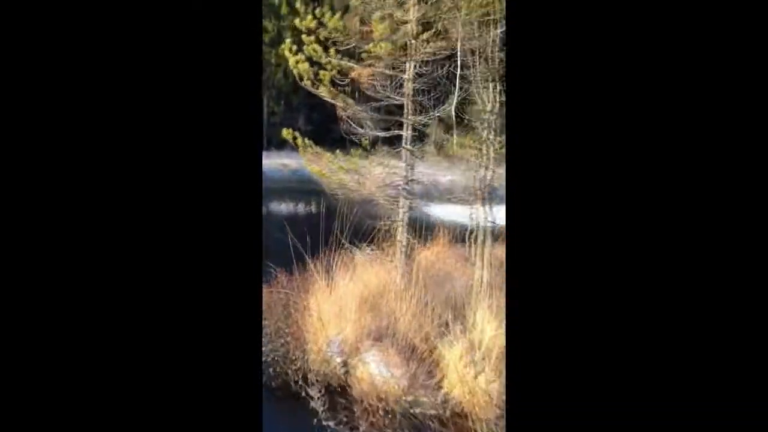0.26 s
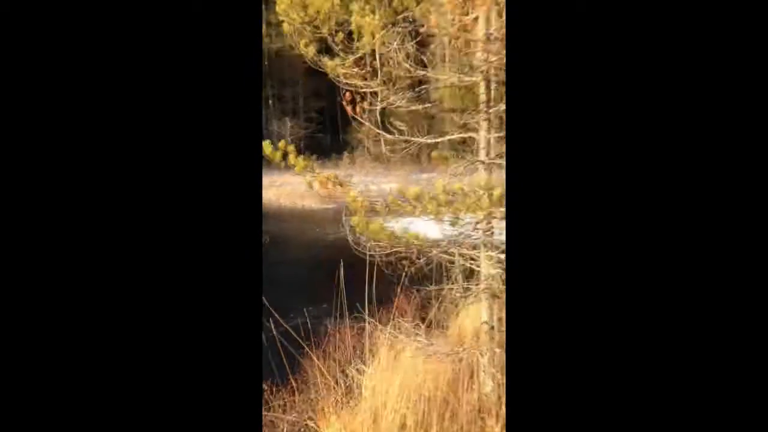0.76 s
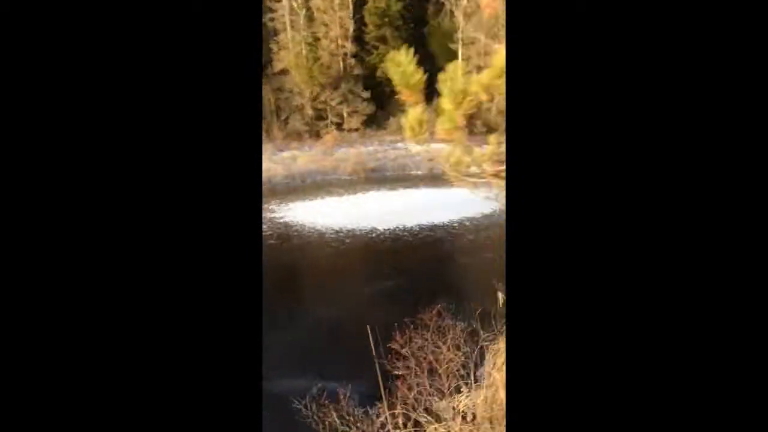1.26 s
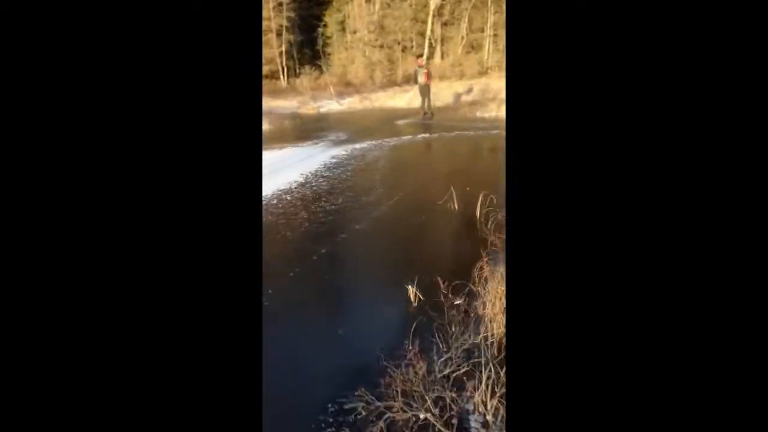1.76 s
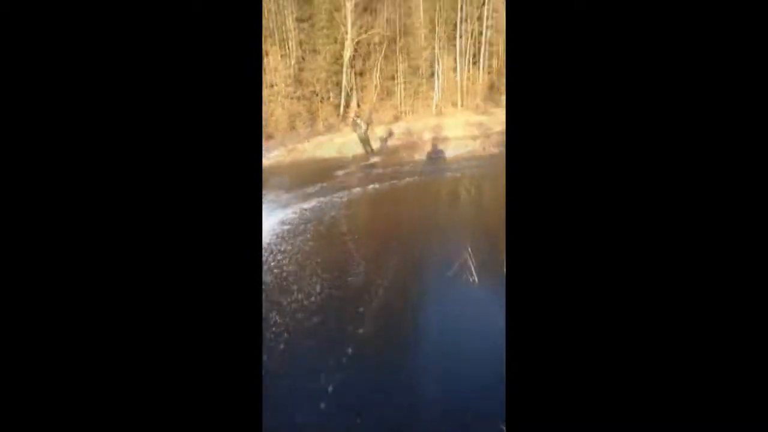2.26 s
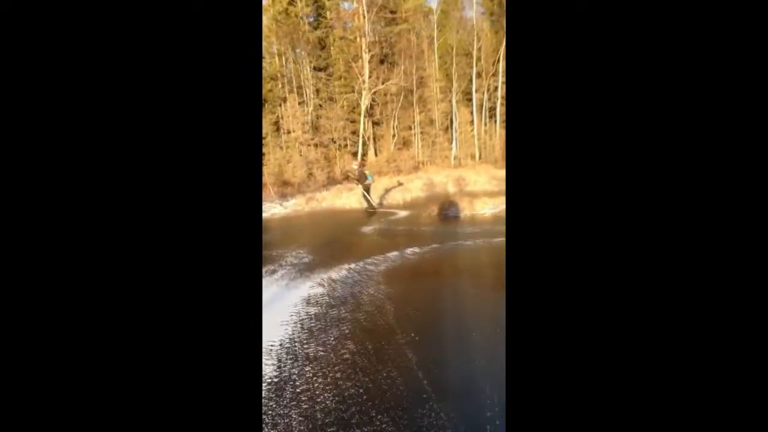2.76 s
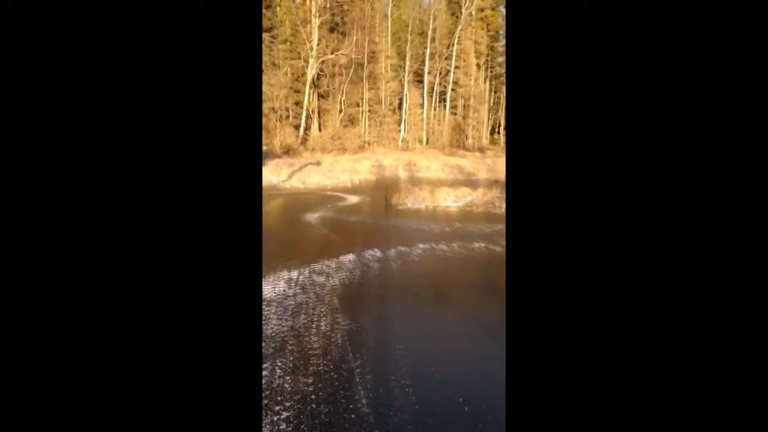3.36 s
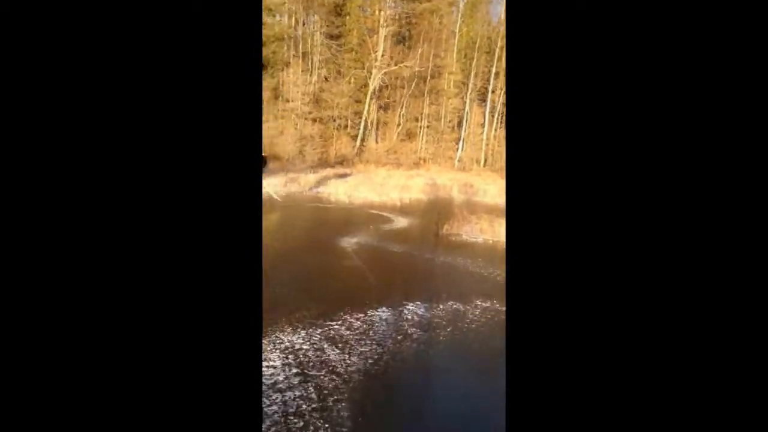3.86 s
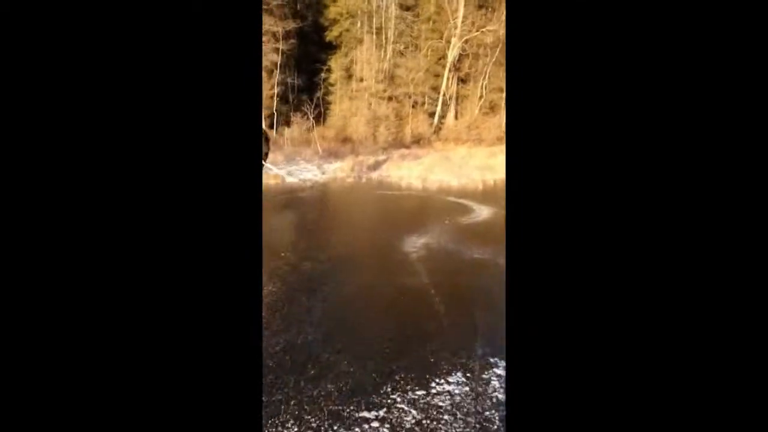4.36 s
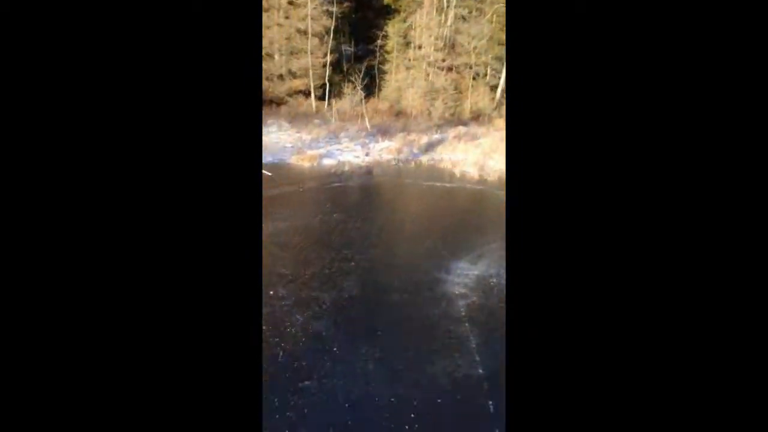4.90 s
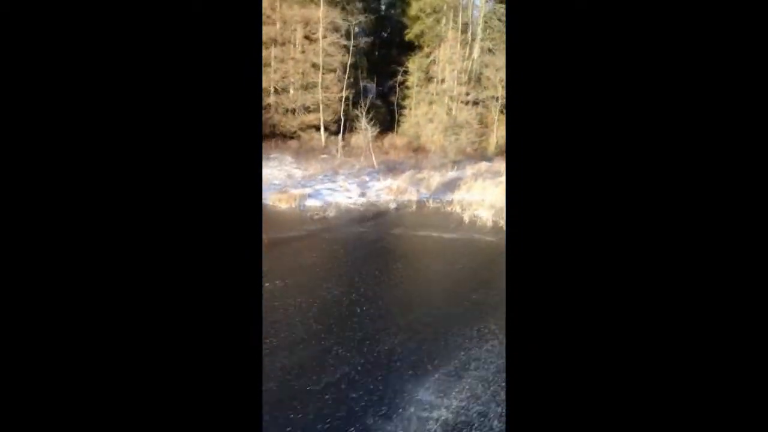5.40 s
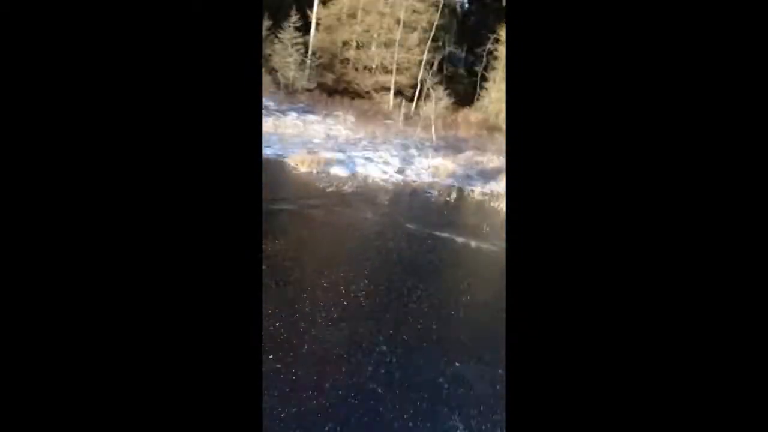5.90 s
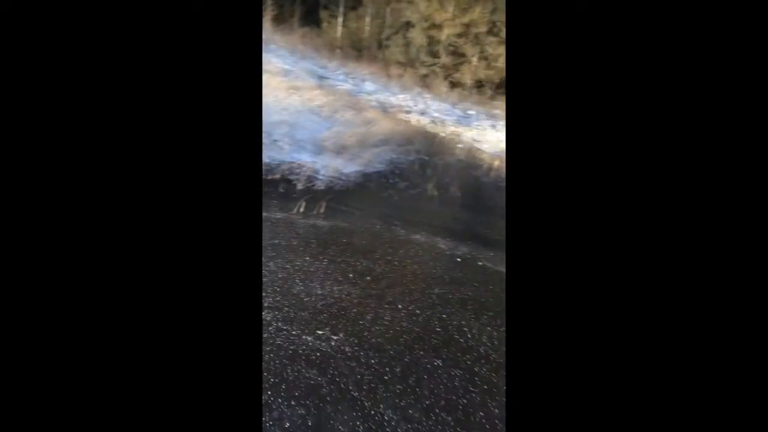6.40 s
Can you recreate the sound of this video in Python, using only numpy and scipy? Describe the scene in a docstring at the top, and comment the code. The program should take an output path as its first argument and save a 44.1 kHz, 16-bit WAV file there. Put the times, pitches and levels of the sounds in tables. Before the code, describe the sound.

A skater's long steel blades on bumpy lake ice, close and dry, over very faint still outdoor air. From 0 to 0.9 s, short gritty scrapes mix with quick metallic rattles, hollow clacks and boot thumps; a small chirp comes near 0.7. From about 1.0 to 1.6 a stronger, smooth ringing scrape swells in several pushes, then fades. Between 1.7 and 3.0 lighter hissing glides with icy fizz pass, with only scattered taps and a soft low ice note near 2.6. A sharp knock at 3.1 begins rougher going: crackles, a cluster of clacks around 3.5, brief slips, and sparse contact near 4. From 4.36 to 5.4 knocks rattle densely, with short dull ice notes. After a lull, a heavy clack at 5.56 leads to the loudest sound from 5.7: a harsh, bright edge scrape, catching repeatedly, easing, then surging again near 6.4 to the end.

```python
"""A frozen lake: long skates run over bumpy ice, heard by the skater over faint still air.
Breaking grains of ice, made as random clicks and noise, grind, ring the steel blades and rumble the boot.
Ridges and lumps give short rattling knocks with a boot thump; blades chirp as they slip sideways, and
the ice sheet sings a few short low notes. Near the end an edge digs in and scrapes hard, catching again
and again."""
import sys
import numpy as np
from scipy import signal
from scipy.fft import rfft, irfft
from scipy.io import wavfile
from scipy.ndimage import uniform_filter1d

SR = 44100
rng = np.random.default_rng(int(sys.argv[2]) if len(sys.argv) > 2 else 0)


def transcribe(u):
    """Save the signal u as a 16-bit wav file named by the first command-line argument.

    u: samples, shape (n,) or (channels, n), limited to [-1, 1]; the rate is SR.
    q: integer samples, one column per channel.
    """
    v = np.clip(np.atleast_2d(u).T, -1, 1)
    q = np.round(v * 32767).astype(np.int16)
    wavfile.write(sys.argv[1], SR, q)


N = 292824
BINS = np.maximum(abs(np.fft.fftfreq(4096, 1 / SR)), 1)  # frequencies of the sound colours, Hz


def amp(db):
    """Turns dB into a plain factor."""
    return 10 ** (np.asarray(db) / 20)


def unit(x):
    """Scales to rms 1."""
    return x / np.sqrt(np.mean(x ** 2) + 1e-20)


def add(mix, s, sound):
    """Lays a sound into the mix at time s."""
    part = mix[max(round(s * SR), 0):][:len(sound)]
    part += sound[:len(part)]


def colour(gain):
    """Makes a filter, of energy 1, that answers at once and has the given gains."""
    spectrum = np.exp(np.conj(signal.hilbert(np.log(gain + 1e-5))))
    response = np.fft.ifft(spectrum).real[:len(gain) // 2]
    return response / np.linalg.norm(response)


def through(x, response):
    """Sends a sound through a filter and keeps its length."""
    return signal.oaconvolve(x, response)[:len(x)]


def shape(points):
    """Gain at every bin, from a few points of a spectrum."""
    hz, db = np.transpose(points)
    return amp(np.interp(np.log(BINS), np.log(hz), db))


def peaks(modes):
    """Gain at every bin of resonances (f/Hz, width/Hz, level/dB) that add in power."""
    return np.sqrt(sum(amp(2 * db) / (1 + (2 * (BINS - hz) / width) ** 2) for hz, width, db in modes))


def stance(table, column):
    """The resonances at their levels for a flat blade (column 0) or one on edge (column 1)."""
    return peaks([(hz, width, levels[column]) for hz, width, *levels in table])


def wobble(rate_hz):
    """Slow chance of rms 1, up to about the given rate."""
    hz = np.fft.rfftfreq(N, 1 / SR)
    gain = hz / (hz + rate_hz / 10) / (1 + (hz / rate_hz) ** 4)
    return unit(irfft(rfft(rng.standard_normal(N)) * gain, N))


# colour of the still air over the lake: (f/Hz, relative level/dB per Hz)
AIR_COLOUR = [(20, -25), (60, 27), (200, -14), (600, -24), (2000, -23), (5000, 0), (15000, -11)]
AIR_DB = -58


def still_air():
    """Steady noise with the colour of open air."""
    return amp(AIR_DB) * unit(through(rng.standard_normal(N), colour(shape(AIR_COLOUR))))


# each spell of a blade pressing on the ice: (t/s, length/s, rise/s, pressure level/dB,
# change of pressure over the length/dB, share of coarse crackle/0-1, added boot shaking/dB, added ice dust/dB)
STROKE_SPELLS = [(-0.02, 0.16, .01, -30.5, -18.5, 0.26, 6.5, -4),
                 (0.176, 0.16, 0.055, -32.5, -14.5, 0.63, 4, -3),
                 (0.48, 0.028, 0.014, -33.5, 5.5, 0.1, 4, -6), (0.537, 0.3, .01, -37.5, -9, 0.35, 2.5, 2.5),
                 (0.875, 0.19, 0.0096, -37, -16, 0, 2, 2), (0.972, .1, 0.015, -28.5, -3, 0.17, 6.5, 4.5),
                 (1.073, 0.04, 0.016, -24, 2, .15, 2.5, 0), (1.131, .15, 0.057, -28, -0.5, 0, -0.5, -0.5),
                 (1.283, 0.1, .03, -29.5, -1, 0.02, -0.5, 0.5),
                 (1.393, .2, 0.026, -24.5, -12, .03, -3, 1.5), (1.79, .11, .01, -38.5, 0, 0, 2.5, 1),
                 (1.893, .14, 0.028, -30, -6, 0.28, -2.5, 1.5), (2.04, 0.21, .01, -45.5, 3.5, 0, 2, 2),
                 (2.226, .28, .02, -39.5, -1.5, 0, 3, 4), (2.284, .09, 0.029, -33, -2, 0, -4.5, 0),
                 (2.53, .32, 0.0087, -43.5, -2.5, 0.07, 1, 5.5),
                 (2.892, 0.23, 0.0053, -39, -12.5, .5, 0.5, 2),
                 (3.101, 0.22, 0.045, -41.5, -2.5, 0.54, 3.5, 3),
                 (3.476, 0.21, 0.032, -32.5, -1.5, 0.84, -1, -7.5), (3.743, .06, .01, -54, 5.5, 0.1, -8, 2),
                 (3.927, 0.048, 0.0077, -53.5, -2, 0.3, -3, -3),
                 (3.83, 0.029, 0.012, -35, -4.5, 0.3, -1, 8),
                 (4.369, 0.018, 0.0039, -27, -0.5, 0.6, -3.5, -3.5),
                 (4.416, .14, .01, -40, -8.5, 0.56, -0.5, -8), (4.563, 0.048, .02, -36, -0.5, 0.75, 5, 0),
                 (4.65, 0.032, .01, -50.5, 0, 0.5, 0, 7), (4.802, 0.039, 0.0084, -35.5, -13, 0.4, 3.5, 7),
                 (4.871, 0.16, 0.017, -40.5, -7, 0.96, -5, 1.5),
                 (5.043, 0.091, 0.015, -29, -5, 0.5, -2.5, -3), (5.137, 0.28, .01, -40.5, -2.5, 0.49, 1, 2),
                 (5.545, 0.017, 0.012, -46, 2, 0.6, 0, -9), (5.598, 0.063, .01, -50, -1, 0.4, -3, 0),
                 (5.655, 0.067, 0.025, -33.5, -14, 1, -3, -6),
                 (5.713, 0.58, 0.0092, -17, -5.5, 0.34, 1.5, -3), (6.197, 0.1, 0.033, -21, 0, 0, -10, 1.5),
                 (6.31, 0.099, 0.0087, -28.5, 6.5, 0.55, -1, -0.5),
                 (6.385, 0.18, 0.028, -17.5, -5.5, 0.23, -5.5, 0.5),
                 (6.566, 0.097, 0.012, -34, 11, 0.48, -4.5, 5.5)]
RELEASE_S = 0.0216  # the weight comes off the blade
COAST_DB, COAST_COARSE = -55, .35  # the lightest contact, between strokes


def contact():
    """Pressure, coarseness, boot shaking and dust over time: strokes press and let go; the strongest leads."""
    t = np.arange(N) / SR
    power = np.full(N, amp(2 * COAST_DB))
    traits = np.outer([COAST_COARSE, 0, 0], power)
    for s, length, rise_s, db, change_db, *own in STROKE_SPELLS:
        rise = np.clip((t - s) / rise_s, 0, 1)
        held = rise * amp(db + change_db * np.clip((t - s) / length, 0, 1))
        release = np.exp(-np.maximum(t - s - length, 0) / RELEASE_S)
        stroke = (held * release) ** 2
        power += stroke
        traits += np.outer(own, stroke)
    # each trait is an average weighted by the power of the strokes
    coarse, boot_db, dust_db = traits / power
    return 10 * np.log10(power), np.clip(coarse, 0, 1), boot_db, dust_db


def grains(per_s, spread_db, smooth):
    """Ice crystals breaking: clicks of uneven size over smooth friction noise."""
    size = amp(spread_db * np.minimum(rng.exponential(1, N), 4.5)) * rng.choice([-1, 1], N)
    clicks = unit(size * (rng.random(N) < per_s / SR))
    return unit(clicks + smooth * rng.standard_normal(N))


# resonances of a blade: (f/Hz, width/Hz, relative level running flat/dB, relative level on edge/dB)
BLADE_MODES = [(2070, 70, -3, -26), (2096, 54, -19, -3.5), (2515, 120, -2.5, 0), (3000, 163, -0.5, -0.5),
               (3250, 116, 0.5, 4.5), (3367, 81, 0.5, -15), (4706, 96, -4, -5), (5290, 120, -14, -11),
               (5780, 73, -38, -13)]
# colour of the steel's sound without pitch: (f/Hz, relative level/dB per Hz)
STEEL_NOISE = [(1200, -32), (1850, 11), (2200, 13.5), (3400, 8.5), (3900, 10.5), (4400, 11.5), (5300, 5),
               (6200, -43), (9000, -48)]


def steel(column, hash_db):
    """Gain of a blade: its resonances over an unpitched noise, inside the band where steel radiates."""
    band = 1 / np.sqrt((1 + (1850 / BINS) ** 14) * (1 + (BINS / 5900) ** 14))
    return np.hypot(band * stance(BLADE_MODES, column), amp(hash_db) * shape(STEEL_NOISE))


def wander(x, depth_db):
    """The contact point travels along the blade, so patches of the spectrum swell and fade."""
    z = signal.stft(x, nperseg=256, noverlap=192)[2]
    patches = rng.standard_normal(z.shape)
    for _ in range(2):
        patches = uniform_filter1d(patches, size=4, axis=0)
        patches = uniform_filter1d(patches, size=8, axis=1)
    swell = unit(amp(depth_db * unit(patches)))
    return signal.istft(z * swell, nperseg=256, noverlap=192)[1][:N]


# colour of the grinding ice: (f/Hz, relative level/dB per Hz)
GRIND_COLOUR = [(200, -35), (450, -6.5), (620, 0.5), (780, 1), (1000, 1), (1380, 1), (1650, -2.5),
                (2050, -4.5), (2450, -26.5), (4000, -36)]
# colour of the boot's rumble on coarse ice or a digging edge: (f/Hz, relative level/dB per Hz)
DEEP_RUMBLE = [(20, -36), (45, -20), (70, -7.5), (110, -8.5), (145, 1), (190, 3.5), (300, -3), (430, -3),
               (540, -16), (700, -14), (1500, -49.5)]
# colour of the rumble while the blade runs smoothly: (f/Hz, relative level/dB per Hz)
SMOOTH_RUMBLE = [(20, -18), (60, -25), (110, -14.5), (170, -7.5), (280, -2), (380, -5.5), (520, -2),
                 (720, -9.5), (1500, -52.5)]
# colour of the fizzing ice dust: (f/Hz, relative level/dB per Hz)
DUST_COLOUR = [(3500, -6.5), (5000, 3.5), (5800, 5.5), (6500, 3), (7300, 1.5), (8400, -1.5), (9500, -3.5),
               (11000, -6.5), (12300, -10), (13500, -8), (15000, -16)]
# high overtones of a blade, against the fizz: (f/Hz, width/Hz, relative level flat/dB, relative level on edge/dB)
HIGH_OVERTONES = [(7100, 43, 0.5, 12), (7650, 130, -3, 10.5), (9440, 290, -5, 9.5), (10200, 90, -8, 9)]
# how the other noises follow the pressure: (level/dB at NORMAL_DB of pressure, dB per dB of pressure)
NORMAL_DB = -35
GRIND_LAW, RUMBLE_LAW, FIZZ_LAW = (-40.5, 0.73), (-40.5, 0.59), (-49.5, 0.92)
RING_FROM_DB, RING_OVER_DB = -42, 7  # the resonances come out over this range of pressure
EDGE_FROM_DB, EDGE_OVER_DB = -27.5, 4  # and over this one the blade tips on its edge


def follow(law, pressure_db):
    """Level in dB of a noise that follows the pressure."""
    db, slope = law
    return db + slope * (pressure_db - NORMAL_DB)


def glide(pressure_db, coarse, boot_db, dust_db):
    """One stream of breaking grains shakes the steel, the ice and the boot."""
    crackle = grains(per_s=380, spread_db=4.2, smooth=.3)
    hiss = grains(per_s=5000, spread_db=1.5, smooth=0.72)
    chatter = unit(amp(1.7 * wobble(rate_hz=110)))
    drive = (np.sqrt(coarse) * crackle + np.sqrt(1 - coarse) * hiss) * chatter

    # light contact is nearly toneless; more pressure brings out the resonances, and the most tips the blade
    pressed = np.clip((pressure_db - RING_FROM_DB) / RING_OVER_DB, .06, 1)
    edged = np.clip((pressure_db - EDGE_FROM_DB) / EDGE_OVER_DB, 0, 1)
    free = unit(through(drive, colour(steel(column=0, hash_db=-12))))
    flat = unit(through(drive, colour(steel(column=0, hash_db=-30))))
    edge = unit(through(drive, colour(steel(column=1, hash_db=-58))))
    ring = (1 - edged) * ((1 - pressed) * free + pressed * flat) + edged * edge

    grind = unit(through(drive + 0.29 * rng.standard_normal(N), colour(shape(GRIND_COLOUR))))

    # coarse ice or a digging edge jolts the boot deeper than a smooth run does
    jolt = np.maximum(coarse, edged)
    deep = unit(through(drive + .5 * rng.standard_normal(N), colour(shape(DEEP_RUMBLE))))
    light = unit(through(drive + .5 * rng.standard_normal(N), colour(shape(SMOOTH_RUMBLE))))
    rumble = np.sqrt(jolt) * deep + np.sqrt(1 - jolt) * light

    spray = drive + 0.92 * rng.standard_normal(N)
    dust_flat, dust_edge = (
        unit(through(spray, colour(shape(DUST_COLOUR) * np.hypot(1, stance(HIGH_OVERTONES, column)))))
        for column in range(2))
    dust = (1 - edged) * dust_flat + edged * dust_edge

    mix = amp(pressure_db) * ring
    mix += amp(follow(GRIND_LAW, pressure_db)) * grind
    mix += amp(follow(RUMBLE_LAW, pressure_db) + boot_db) * rumble
    mix += amp(follow(FIZZ_LAW, pressure_db) + dust_db) * dust
    return wander(mix, depth_db=2.0)


def thump(t, hz):
    """The boot swings briefly with sagging pitch, with a higher knock of the sole and a faint hum of the ice."""
    lag, ratio, weight, tone, hum = rng.random(5)
    rise = 1 - np.exp(-t / 0.00072)
    # the pitch sags from about 1.28 to 0.71 times hz
    swing = np.sin(2 * np.pi * hz * (0.71 * t + 0.0024 * (1 - np.exp(-t / 0.0042))))
    body = swing * np.exp(-t / 0.0025)
    late = np.maximum(t - 0.00319 * lag, 0)
    sole_tone = np.sin(2 * np.pi * hz * (1.316 + 0.95 * ratio) * late)
    sole = (0.14 + 0.25 * weight) * sole_tone * np.exp(-late / 0.0032)
    push = 0.017 * np.sin(2 * np.pi * 55 * t) * np.exp(-t / 0.016)  # the leg takes the jolt
    sheet_tone = np.sin(2 * np.pi * (240 + 200 * tone) * t * (1 - 2.2 * t))
    sheet = (0.014 + 0.19 * hum) * sheet_tone * np.exp(-t / 0.0044)
    no_deep_bass = signal.butter(3, 120, "highpass", fs=SR, output="sos")
    return signal.sosfilt(no_deep_bass, rise * (body + sole + sheet)) + push


# ridges and lumps that the blades strike, levels before the trims in knocks():
# (t/s, steel level/dB, thump base f/Hz, thump level/dB, clack f/Hz, clack level/dB, splinter level/dB)
LUMPS = [(0.0315, -26, 191, -27, 776, -27.5, -48), (0.0481, -20, 169, -31, 666, -27, -51),
         (0.1026, -16.5, 221, -25.5, 870, -23, -50), (0.1293, -11.5, 396, -18.5, 766, -21.5, -41),
         (0.1785, -28, 183, -30, 1087, -35, -52), (0.2404, -31, 200, -27, 730, -29, -50),
         (0.2947, -18.5, 166, -30, 920, -23, -51), (0.3196, -19.5, 207, -21, 1186, -35, -49.5),
         (0.3508, -22.5, 269, -44.5, 2020, -35, -47), (0.4451, -26.5, 228, -29.5, 1470, -38, -47),
         (0.484, -17.5, 262, -28, 1050, -28, -40), (0.514, -19, 447, -44, 759, -18.5, -46),
         (0.546, -24, 377, -29.5, 2030, -25, -55), (0.587, -17, 363, -32, 1100, -24, -50),
         (0.659, -23, 413, -19.5, 1170, -23, -37.5), (0.7318, -22, 256, -23, 1158, -34, -42),
         (0.8644, -24, 512, -36, 915, -27.5, -40), (0.8793, -22, 385, -34, 890, -31, -39),
         (0.915, -26, 330, -39, 1020, -30, -36), (1.6659, -26, 267, -29.5, 1510, -37, -46),
         (1.6916, -26.5, 221, -33, 1350, -38, -43), (1.7875, -24, 260, -26.5, 670, -36, -47),
         (2.4391, -30, 497, -32.5, 651, -44, -44), (2.5634, -28, 238, -26.5, 1150, -34, -44),
         (2.653, -21, 433, -28.5, 1820, -39, -43), (2.8183, -25, 253, -30.5, 1440, -52, -42),
         (2.9629, -19.5, 224, -29.5, 1200, -35, -44), (3.0341, -26, 400, -24.5, 1133, -39, -39),
         (3.1038, -14.5, 310, -26.5, 950, -30, -39), (3.138, -6, 214, -18, 1250, -22.5, -36),
         (3.2051, -26, 350, -31, 1152, -35, -39), (3.243, -22, 192, -30, 1326, -31, -56),
         (3.2862, -32, 186, -29.5, 1675, -40, -40), (3.3318, -26.5, 185, -24, 1660, -37.5, -42),
         (3.3766, -31, 315, -44, 1180, -37.5, -50), (3.4335, -29, 334, -42, 1120, -41, -50),
         (3.4976, -11, 242, -31, 2010, -30, -41), (3.5093, -16, 261, -34, 1980, -47, -51),
         (3.554, -16, 185, -30, 1170, -27, -53), (3.5787, -14.5, 325, -29.5, 1985, -32, -41.5),
         (3.7014, -31, 270, -44, 1960, -29, -37), (3.7441, -15, 182, -24, 1810, -30.5, -41),
         (3.7913, -30, 250, -37.5, 1820, -52, -51), (3.8232, -27, 354, -28.5, 1000, -34, -43),
         (3.922, -26, 200, -30, 1270, -35.5, -47), (3.9668, -22, 210, -23.5, 1300, -25.5, -46),
         (4.0473, -12.5, 205, -19, 890, -23.5, -38), (4.066, -31, 322, -38, 689, -50, -41),
         (4.1096, -32, 409, -53, 1290, -39, -57), (4.1425, -39, 221, -50, 1290, -37.5, -55),
         (4.175, -35, 183, -39.5, 1760, -43, -56), (4.218, -24, 207, -27.5, 1330, -31.5, -47),
         (4.292, -25, 214, -36, 1810, -31, -41.5), (4.333, -26, 285, -25.5, 1210, -31, -48),
         (4.36, -11, 205, -32, 1906, -47, -46), (4.4362, -17, 256, -22.5, 936, -26.5, -51),
         (4.4782, -22, 210, -32, 1307, -30.5, -55), (4.5071, -18, 245, -22, 1140, -24.5, -52),
         (4.5378, -29, 285, -30, 1070, -41, -51), (4.581, -16, 319.5, -28.5, 681, -29, -45),
         (4.6139, -19.5, 164, -25.5, 1953, -31, -44), (4.6368, -16, 361, -34, 861, -31, -43),
         (4.6887, -13.5, 279, -22.5, 1490, -31, -39), (4.7374, -20, 166, -26, 736, -29.5, -43.5),
         (4.7783, -30, 236, -30, 883, -35, -45), (4.8181, -15.5, 153, -30.5, 1920, -25, -43.5),
         (4.9322, -12.5, 208, -28.5, 1410, -24, -28.5), (4.9823, -18, 240, -30, 1750, -19.5, -37),
         (5.024, -27, 244, -24.5, 1200, -33, -45), (5.1302, -30, 197, -24, 1150, -24, -49),
         (5.216, -12.5, 366, -26, 1460, -28, -36.5), (5.257, -15, 174.2, -22.5, 1950, -25, -43),
         (5.3495, -18, 198.5, -26, 1310, -23, -34), (5.5323, -23.5, 260, -31, 1220, -27.5, -42.5),
         (5.5612, -2.5, 200, -18.5, 884, -19.5, -32), (5.6193, -29, 198, -27, 926, -34, -53),
         (5.683, -14.5, 195, -23.5, 1510, -23.5, -43), (5.7058, -17, 304, -27, 1030, -24.5, -37)]
KNOCK_STEEL_HZ, KNOCK_SCATTER_HZ = 3100, 340  # where the blade answers a blow, and how far that varies
CLIMB_S, CLIMB_DB = 0.0013, 4  # grains crushed just before a blow


def knocks(rows, size=3000):
    """The blade climbs a lump, strikes it and taps twice more within a few ms; the boot thumps."""
    lead, out = 180, np.zeros(N)  # samples of climbing before the blow
    t = (np.arange(size) - lead) / SR
    after = np.maximum(t, 0)
    blade, ice, dust = steel(column=1, hash_db=-13.5), shape(GRIND_COLOUR), colour(shape(DUST_COLOUR))
    span = SR / 100  # levels are rms over 10 ms
    for s, steel_db, thump_hz, thump_db, clack_hz, clack_db, splinter_db in rows:
        gap, later, second, third, place = rng.random(5)
        climb = amp(CLIMB_DB) * np.exp(-abs(t) / CLIMB_S)
        fade = np.exp(-after / 0.0046) + 0.063 * np.exp(-after / 0.012)
        blow = 0.095 * rng.standard_normal(size) * np.where(t < 0, climb, fade)
        blow[lead] += 1
        blow[lead + round(SR * (.0005 + .0012 * gap))] += 0.76 + 0.42 * second
        blow[lead + round(SR * (.0019 + .0016 * later))] -= 0.2 + 1.15 * third
        # where the lump meets the blade decides which pitches speak
        steel_hz = KNOCK_STEEL_HZ + KNOCK_SCATTER_HZ * (2 * place - 1)
        clack = through(blow, colour(ice * peaks([(clack_hz, 620, 0)])))
        ring = through(blow, colour(blade * peaks([(steel_hz, 1300, 0)])))
        splinter = through(blow, dust)
        parts = ((thump(after, thump_hz), thump_db - 1.96), (clack, clack_db - 5),
                 (ring, steel_db - 14.5), (splinter, splinter_db - 6.0))
        knock = sum(amp(db) * part * np.sqrt(span / np.sum(part ** 2)) for part, db in parts)
        add(out, s - lead / SR + .0004, knock)
    return out


# small bumps met at random; the rate is for fully coarse ice and falls with the square of coarseness
BUMPS_PER_S = 36
BUMP_OVER_PRESSURE_DB, BUMP_MAX_DB, BUMP_SPREAD_DB = 14, -29, 3  # the spread comes after the maximum
BUMP_THUMP_HZ = 265  # middle of a range one octave wide
BUMP_THUMP_DB, BUMP_CLACK_DB, BUMP_SPLINTER_DB = -3, -6.5, -16  # against the bump's steel level


def bumps(pressure_db, coarse, count=400):
    """Random faint knocks that grow with the pressure up to a limit, as rows like those of LUMPS."""
    rows = []
    for when, chance, size, low, high in rng.random((count, 5)):
        at = int(when * N)
        if chance < BUMPS_PER_S * coarse[at] ** 2 * N / SR / count:
            db = min(pressure_db[at] + BUMP_OVER_PRESSURE_DB, BUMP_MAX_DB)
            db += BUMP_SPREAD_DB * (2 * size - 1)
            thump_hz, clack_hz = BUMP_THUMP_HZ * 2 ** (low - .5), 800 + 1100 * high
            rows.append((at / SR, db, thump_hz, db + BUMP_THUMP_DB, clack_hz, db + BUMP_CLACK_DB,
                         db + BUMP_SPLINTER_DB))
    return rows


# a blade slips sideways with a short rasping chirp: (t/s, length/s, first f/Hz, last f/Hz, width/Hz, level/dB)
SLIP_CHIRPS = [(0.681, 0.014, 2320, 2160, 400, -26.5), (0.975, 0.015, 1520, 3150, 500, -31),
               (0.977, 0.014, 6460, 4770, 1310, -28.5), (2.472, 0.036, 2370, 2610, 500, -41),
               (3.645, 0.041, 2234, 1850, 1087, -31.5), (3.836, 0.021, 3900, 3500, 605, -33.5),
               (3.837, 0.019, 2720, 2630, 200, -33.5), (4.667, 0.015, 5260, 4700, 910, -39),
               (4.89, .03, 2490, 2295, 496, -43), (5.065, 0.0051, 2060, 1760, 360, -25.5),
               (5.075, 0.021, 2620, 3050, 600, -33)]
SLIP_JUDDER_DB = 4.5  # a slipping blade keeps catching


def slips():
    """Stick and slip: a narrow band of noise whose pitch slides while its level judders."""
    out = np.zeros(N)
    for s, length, first_hz, last_hz, width_hz, db in SLIP_CHIRPS:
        count = round(length * SR)
        smooth = signal.butter(2, width_hz / 2, fs=SR, output="sos")
        noise = rng.standard_normal(2 * count) + 1j * rng.standard_normal(2 * count)
        rasp = signal.sosfilt(smooth, noise)[count:]
        # turning the slow noise moves it up to the sliding pitch
        turn = np.exp(2j * np.pi * np.cumsum(np.linspace(first_hz, last_hz, count)) / SR)
        judder = amp(SLIP_JUDDER_DB * unit(uniform_filter1d(rng.standard_normal(count), size=60)))
        chirp = (rasp * turn).real * judder * signal.windows.tukey(count, .5)
        add(out, s, amp(db) * unit(chirp))
    return out


# after some knocks the ice sheet sings a short low note: (t/s, f/Hz, starting level/dB, time to fall 60 dB/s)
SHEET_NOTES = [(2.568, 273, -31, 0.091), (3.826, 396, -23, 0.04), (4.057, 332, -20, 0.042),
               (4.093, 365, -38, .12), (4.692, 300, -16, 0.031)]


def ice_notes(size=6000):
    """The sheet flexes and rings, its pitch sinking a little."""
    t, out = np.arange(size) / SR, np.zeros(N)
    for s, hz, db, t60 in SHEET_NOTES:
        swell = amp(db - 60 * t / t60) * (1 - np.exp(-t / 0.0032))
        add(out, s, swell * np.sin(2 * np.pi * hz * t * (1 - 0.64 * t)))
    return out


# the edge catches during the hard scrape: (t/s, peak level/dB before a 6 dB cut in bites())
EDGE_BITES = [(5.73, -1.5), (5.741, 7.5), (5.754, -7), (5.781, -9), (5.797, -25), (5.83, -0.5), (5.870, -1),
              (5.899, -10), (5.919, -6), (5.986, -15.5), (6.018, -5), (6.103, -23), (6.137, -6),
              (6.212, -7)]


def bites(size=1024):
    """The edge sticks and tears free: a burst of noise that rings the blade's strongest resonances."""
    t, out = np.arange(size) / SR, np.zeros(N)
    blade = colour(steel(column=1, hash_db=-24) * peaks([(2880, 870, 0)]))
    for s, db in EDGE_BITES:
        burst = rng.standard_normal(size) * np.exp(-t / 0.0062)
        ring = through(burst, blade)
        add(out, s - .001, amp(db - 6.0) * ring / abs(ring).max())
    return out


def scene():
    """Skates over a faint floor of open air."""
    air = still_air()
    pressure_db, coarse, boot_db, dust_db = contact()
    skates = glide(pressure_db, coarse, boot_db, dust_db)
    skates += knocks(LUMPS) + knocks(bumps(pressure_db, coarse))
    skates += slips() + ice_notes() + bites()
    return (skates + air)[None]


EDGE_HZ = 14950  # nothing much is heard above this


def record(dry):
    """The loudest peaks are rounded off; then the highest treble is cut."""
    rounded = dry / (1 + (dry / .95) ** 6) ** (1 / 6)
    band_limit = signal.firwin(511, EDGE_HZ, window=("kaiser", 9), fs=SR)
    return signal.oaconvolve(rounded, band_limit[None], "same")


dry = scene()
out = record(dry)
transcribe(out)
```